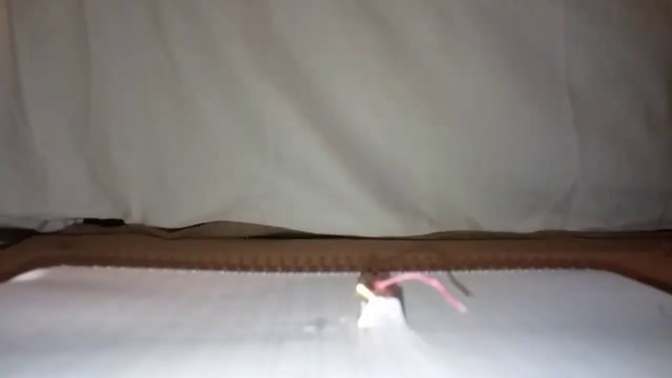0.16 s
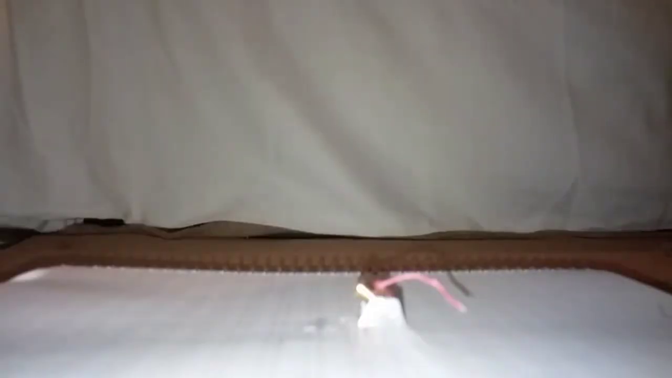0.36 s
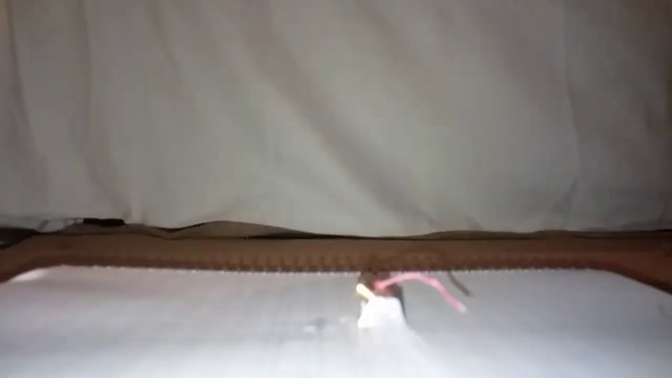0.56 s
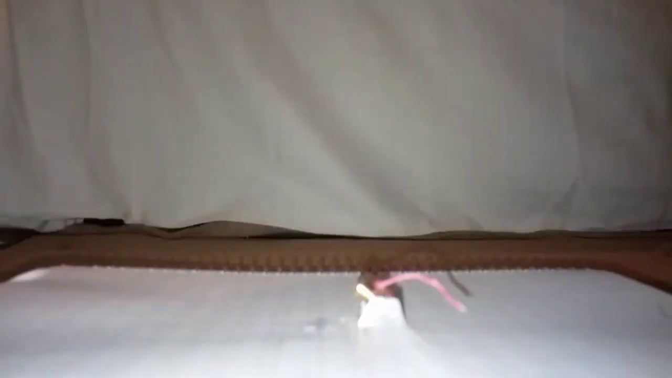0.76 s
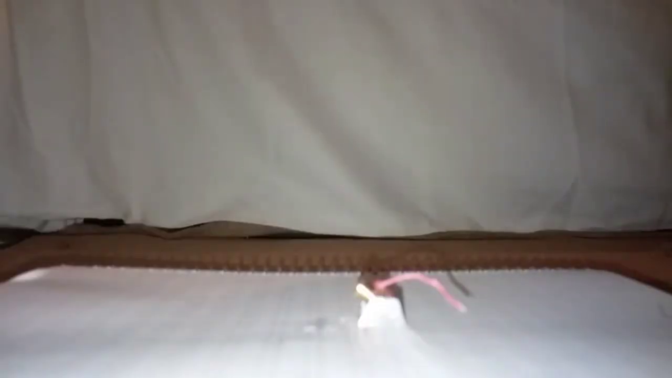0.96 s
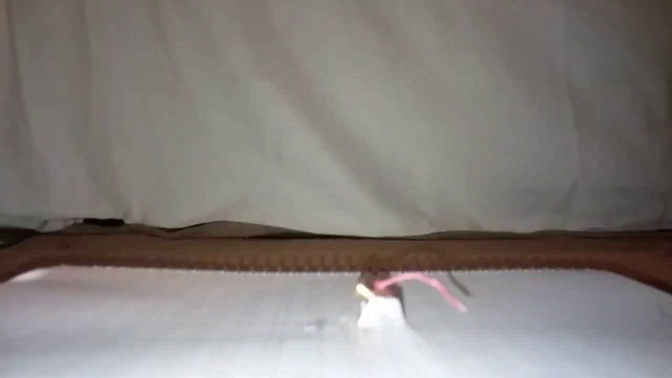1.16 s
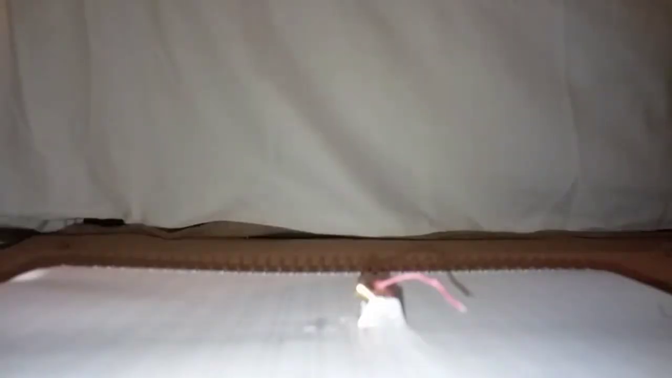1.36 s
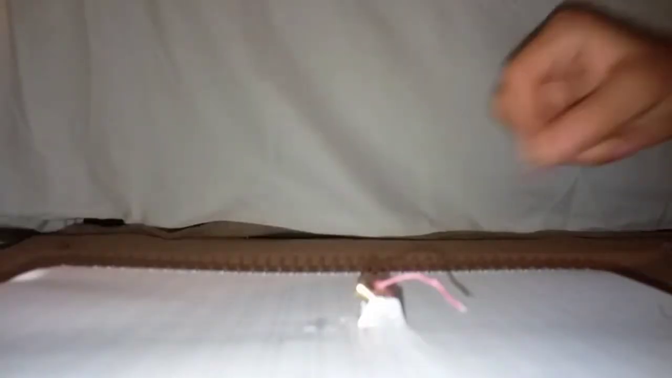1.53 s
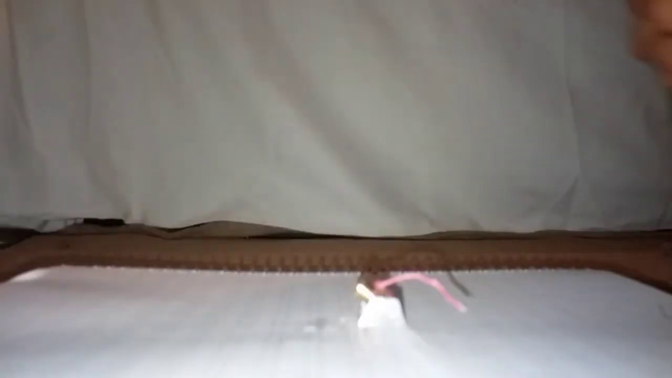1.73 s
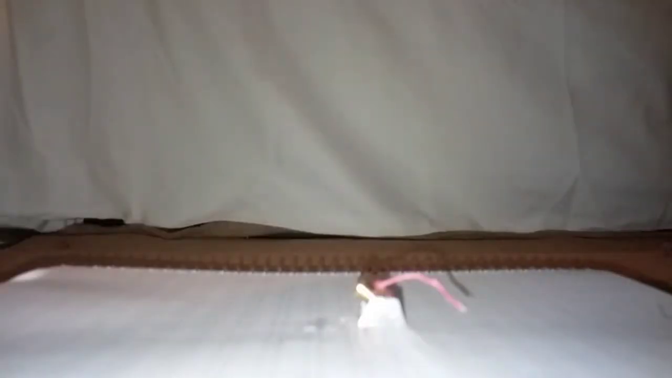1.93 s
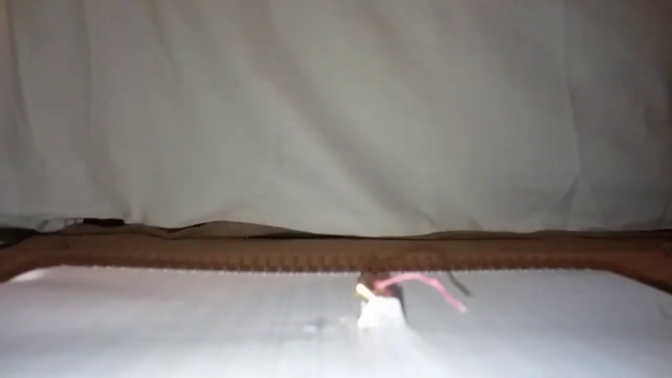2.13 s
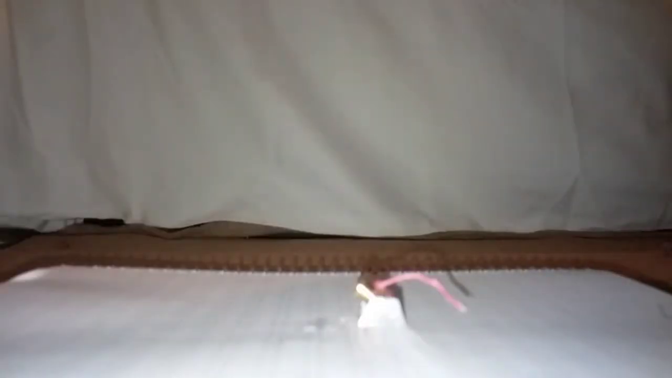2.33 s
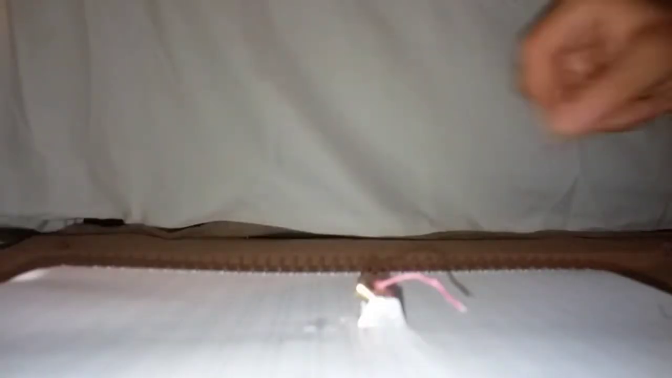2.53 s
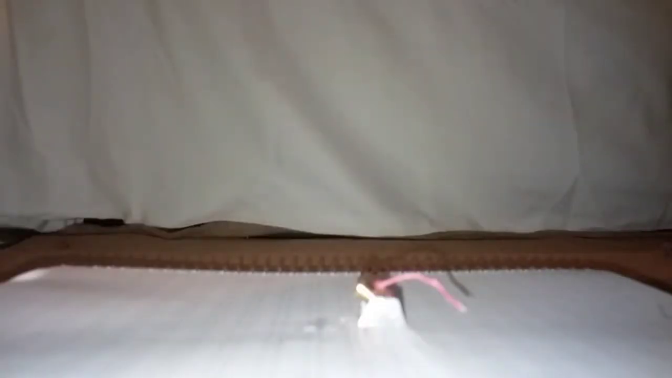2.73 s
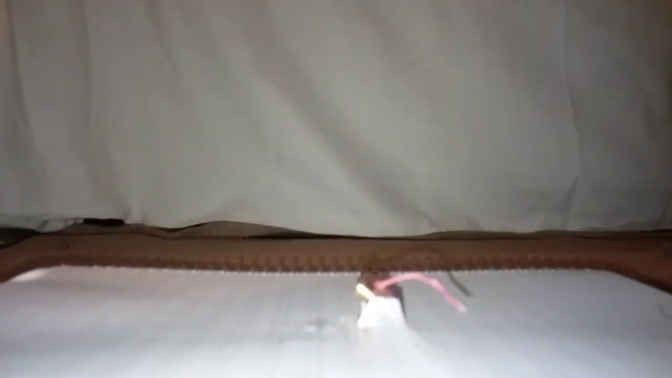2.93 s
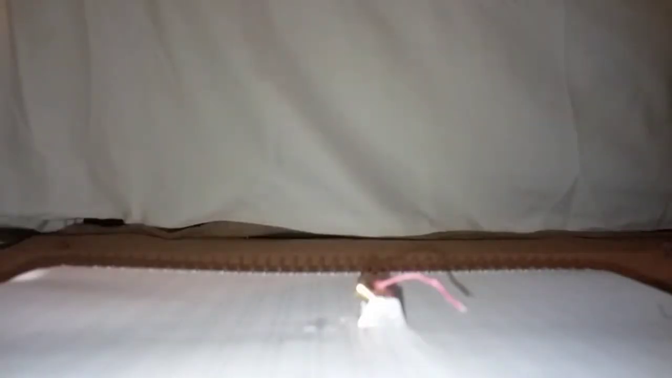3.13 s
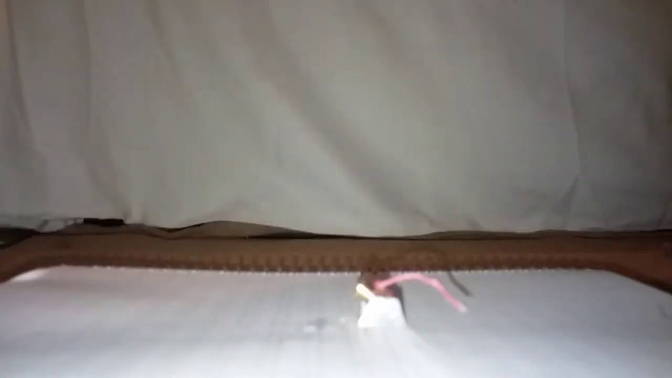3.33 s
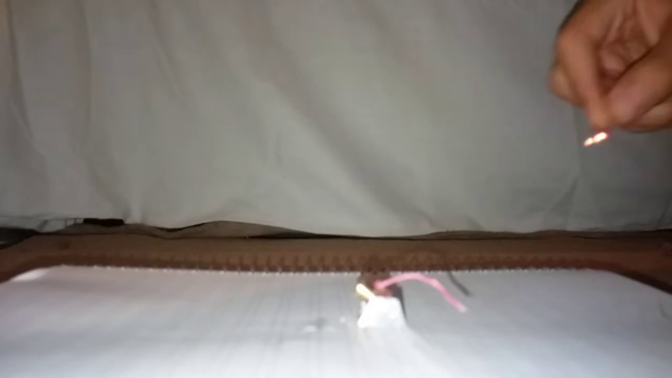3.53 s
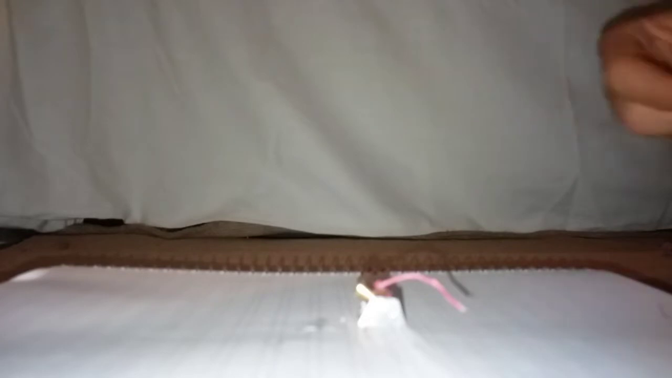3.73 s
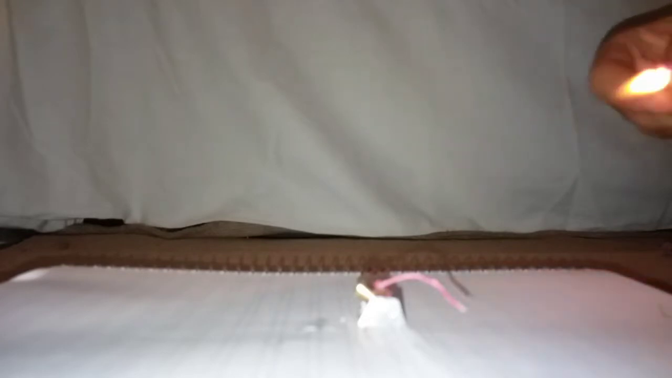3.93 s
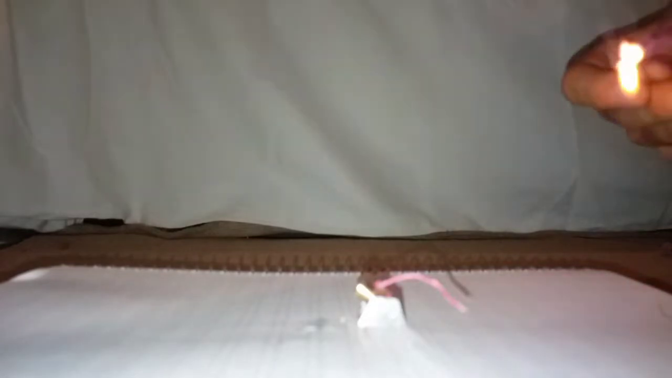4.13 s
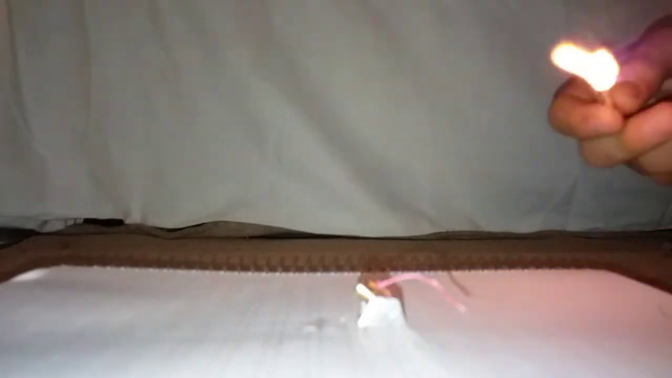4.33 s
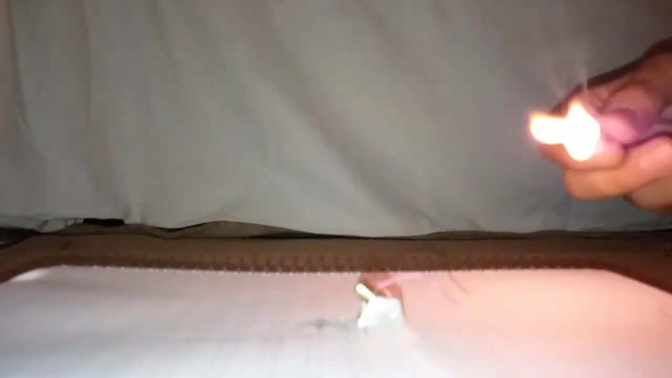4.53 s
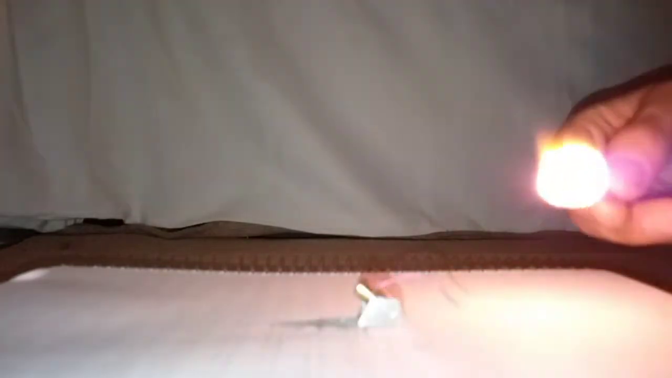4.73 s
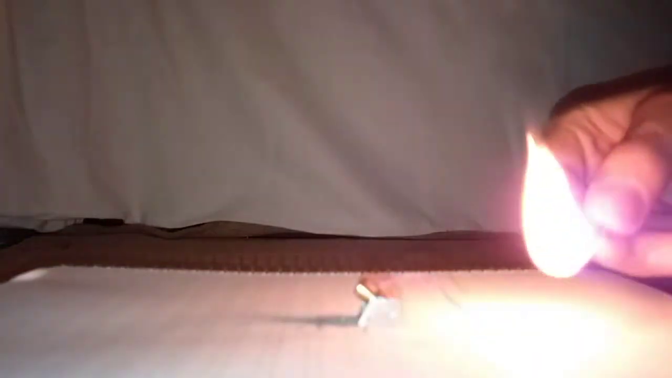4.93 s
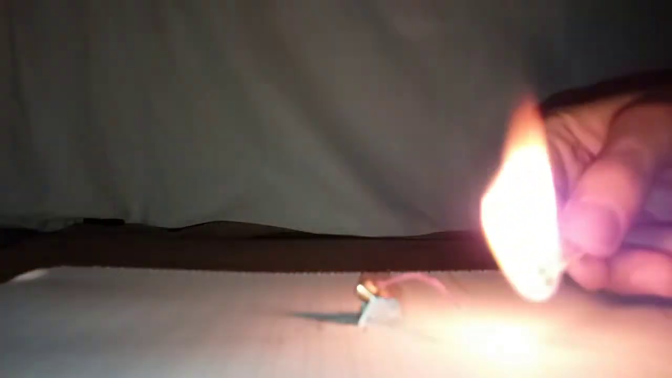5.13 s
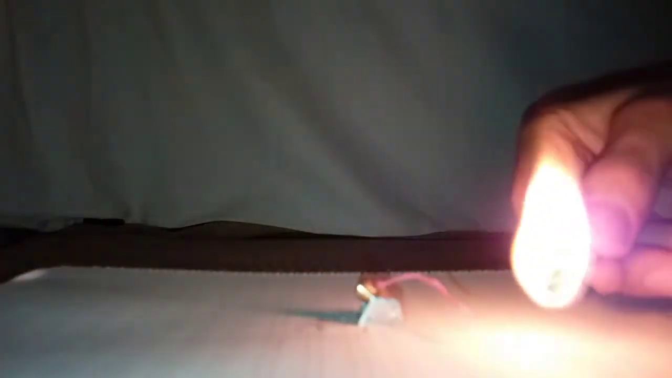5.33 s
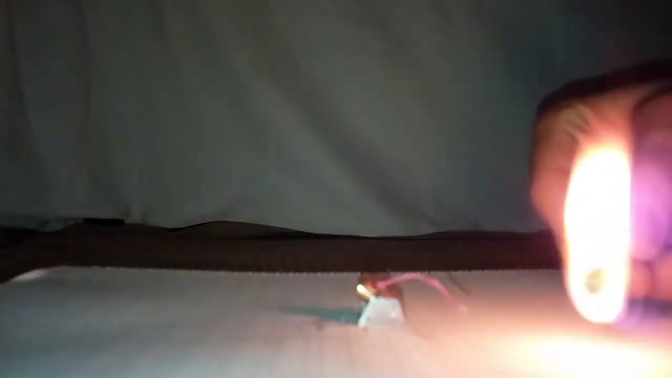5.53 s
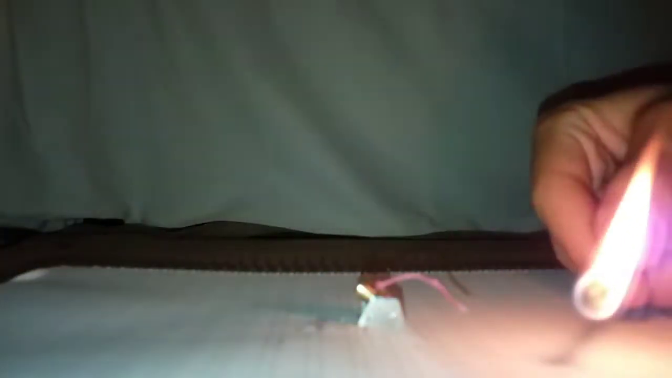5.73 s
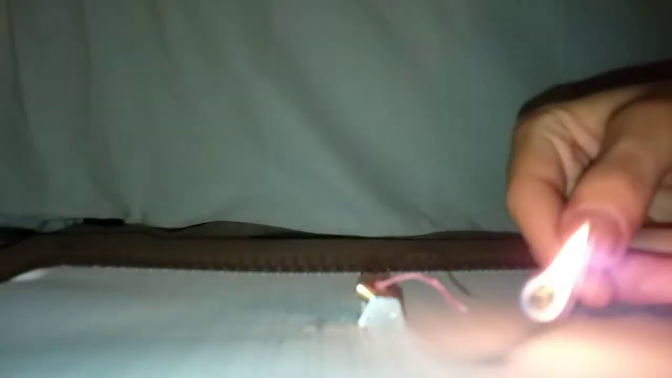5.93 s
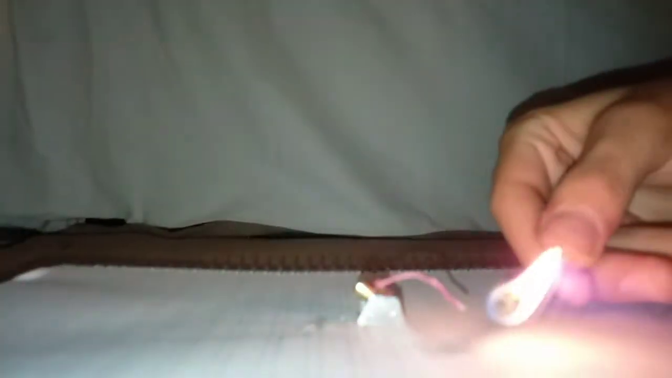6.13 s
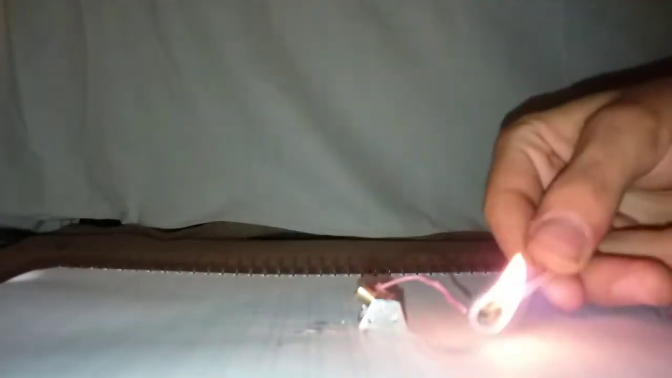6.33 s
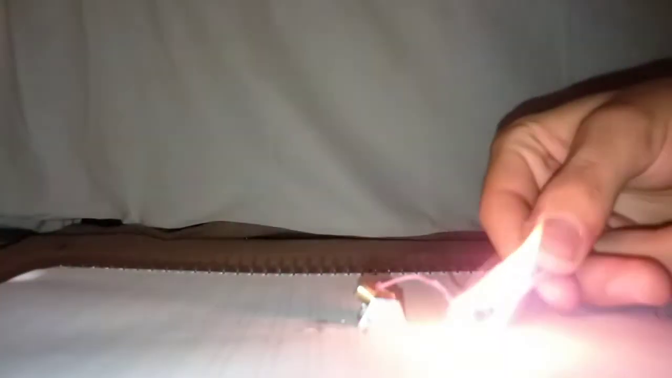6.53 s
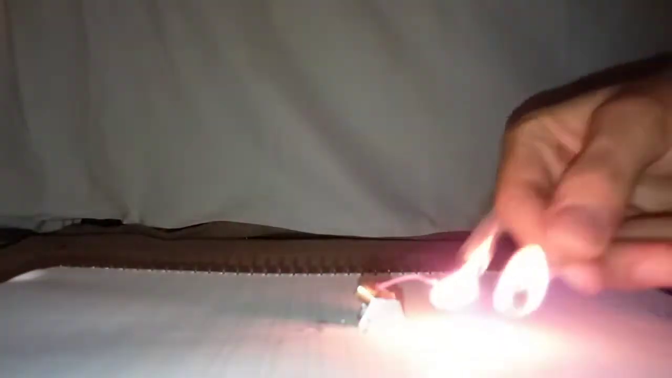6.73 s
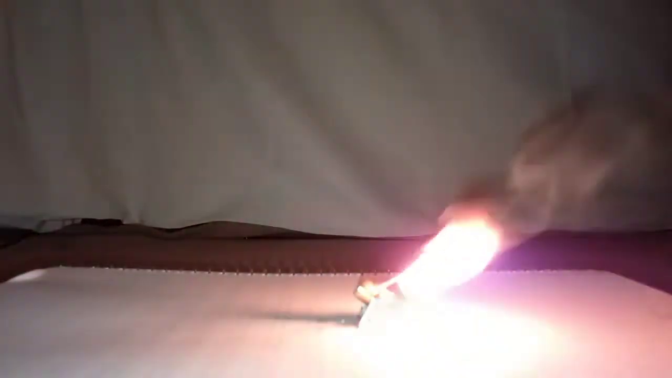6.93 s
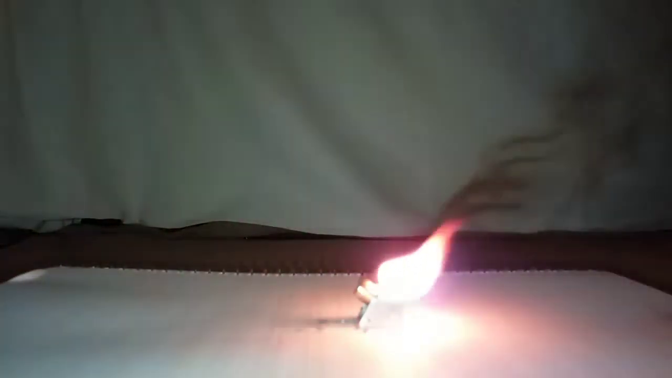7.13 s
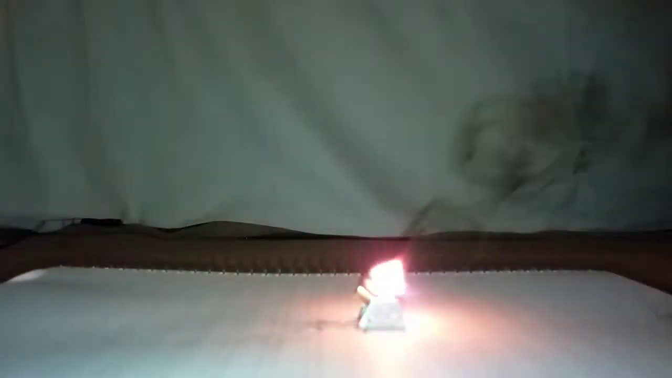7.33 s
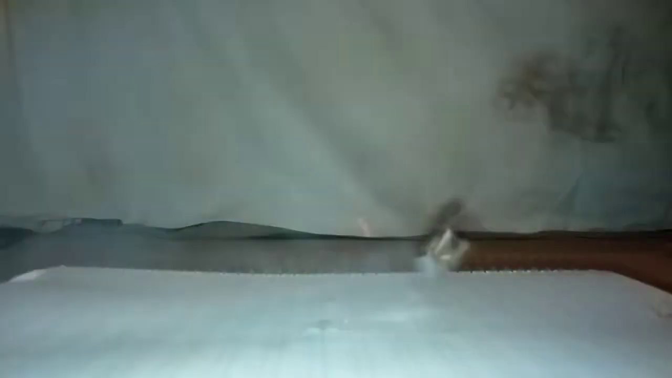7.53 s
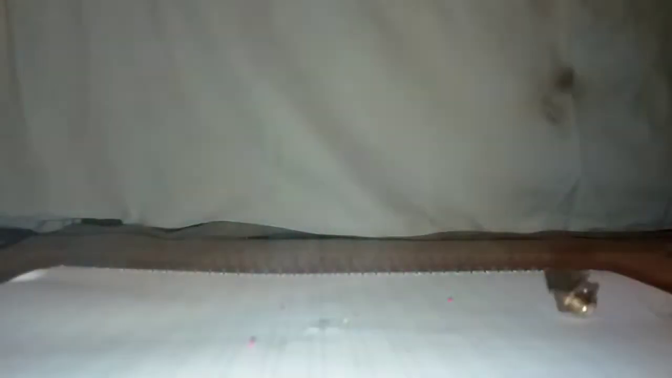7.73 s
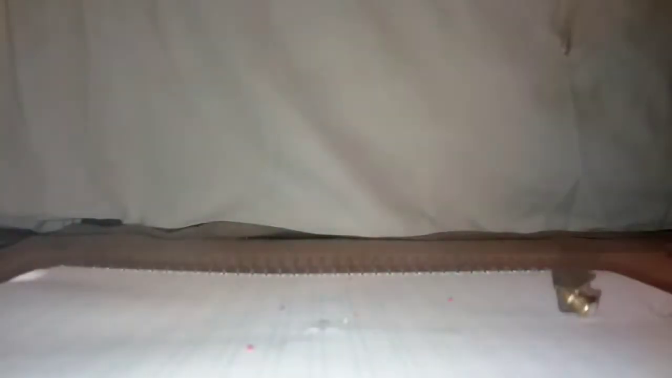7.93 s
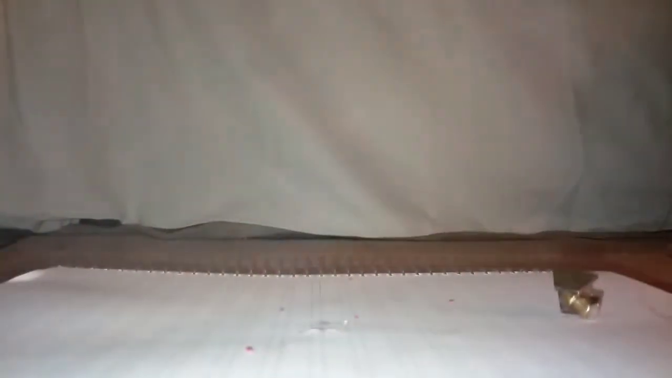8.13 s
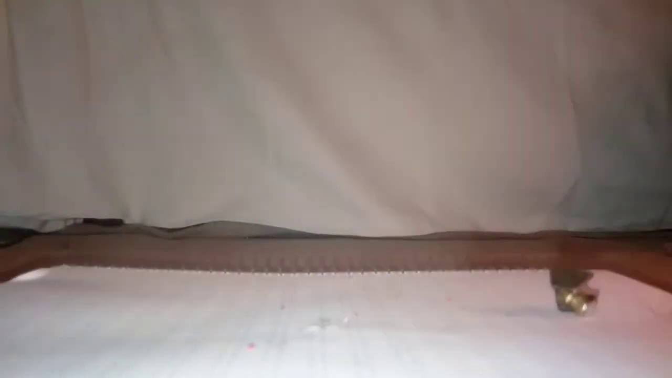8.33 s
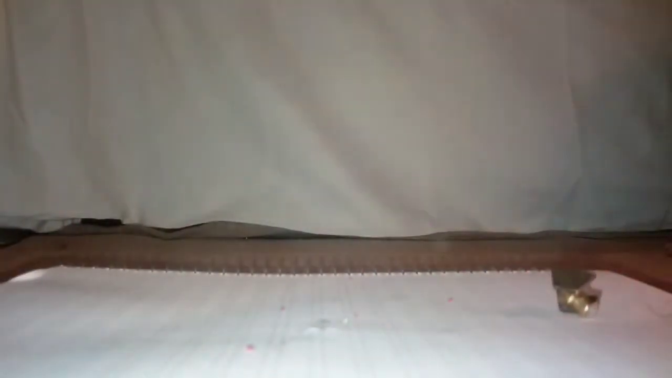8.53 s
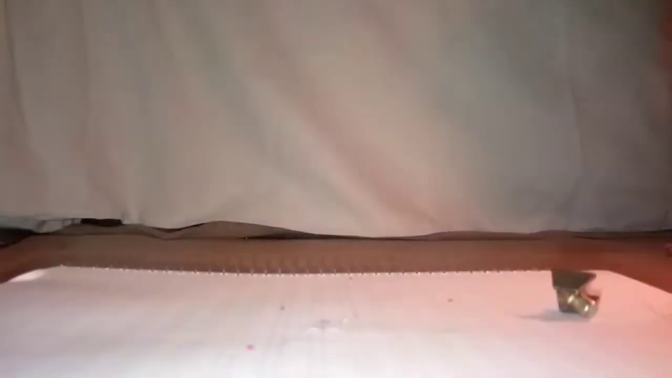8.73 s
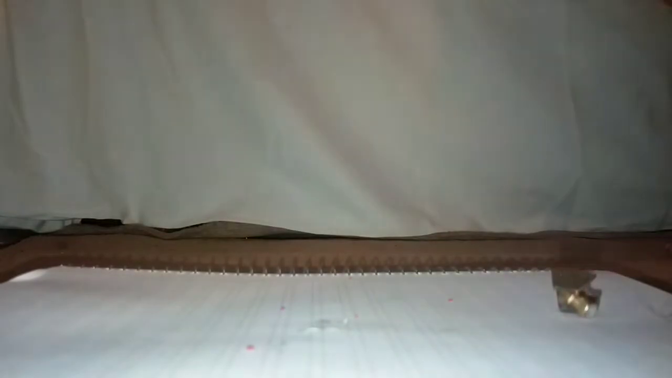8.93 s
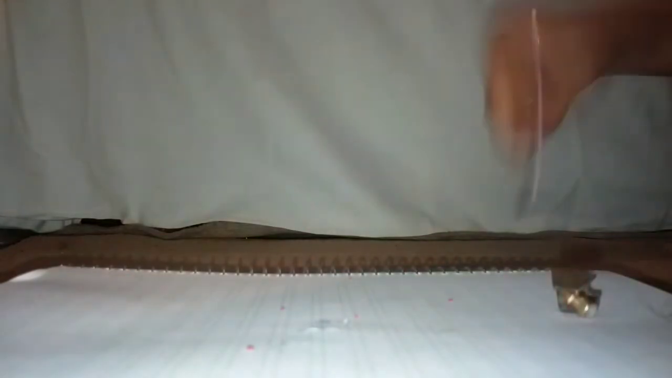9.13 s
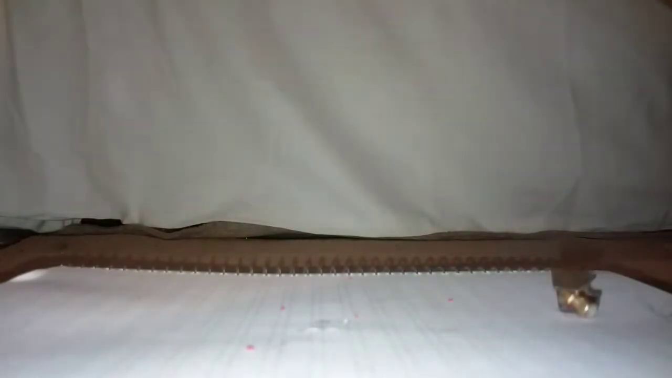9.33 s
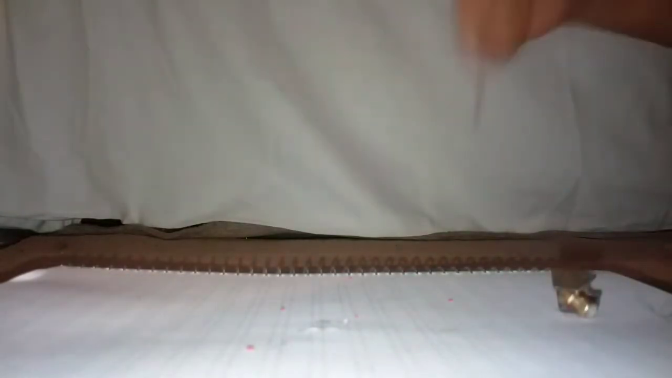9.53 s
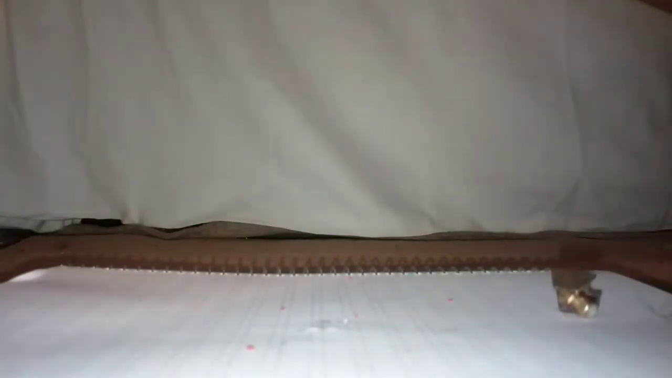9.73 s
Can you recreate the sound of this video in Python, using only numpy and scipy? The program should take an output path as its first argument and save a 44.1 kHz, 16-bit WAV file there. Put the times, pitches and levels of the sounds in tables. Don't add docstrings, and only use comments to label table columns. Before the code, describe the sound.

Match strokes, a crackling flame and a spitting fuse lead to one sharp overloaded blast with ringing metal, then small rattles in a quiet humming room.

```python
import sys
import numpy as np
from scipy import signal
from scipy.fft import rfft, irfft, next_fast_len
from scipy.io import wavfile
from scipy.ndimage import uniform_filter1d, minimum_filter1d

SR = 44100
rng = np.random.default_rng(int(sys.argv[2]) if len(sys.argv) > 2 else 0)


def to_wav(s):
    ch = np.atleast_2d(s).T
    pcm = np.round(np.clip(ch, -1, 1) * 32767)
    wavfile.write(sys.argv[1], SR, pcm.astype(np.int16))


def field_ratio(decibels):
    return 10 ** (np.asarray(decibels, dtype=float) / 20)


N = 435266

# (frequency [Hz], t60 [s])
ROOM = [(60, 0.92), (150, 0.48), (500, 0.51), (1500, 0.48), (4000, 0.43), (8000, 0.33), (14000, 0.28)]
# (frequency [Hz], level [dB per Hz])
CLICK = [(250, -13), (500, 0.5), (2000, 3.5), (8200, -1.5), (9200, -14), (16000, -12.5)]


def evened(x):
    return x / np.sqrt(np.mean(x ** 2) + 1e-20)


def read(points, hz):
    f, value = np.transpose(points)
    return np.interp(np.log(hz + 1), np.log(f + 1), value)


def add(mix, s, sound):
    part = mix[round(s * SR):][:len(sound)]
    part += sound[:len(part)]


def colour(x, spectrum):
    hz = abs(np.fft.fftfreq(8192, 1 / SR))
    log_gain = np.log(field_ratio(np.maximum(read(spectrum, hz), -90)))
    taps = np.fft.ifft(np.exp(np.conj(signal.hilbert(log_gain)))).real[:4096]
    return signal.oaconvolve(x, taps)[:len(x)]


def resonate(x, hz, width_hz, times=1):
    pole = np.exp((2j * np.pi * hz - np.pi * width_hz) / SR)
    for _ in range(times):
        x = 2 * signal.lfilter([1 - abs(pole)], [1, -pole], x).real
    return x


def highpass(x, order, hz):
    return signal.sosfilt(signal.butter(order, hz, "high", fs=SR, output="sos"), x)


def wander(size, span):
    return evened(uniform_filter1d(uniform_filter1d(rng.standard_normal(size), span), span))


def tail(length_s, spectrum, longer=1):
    hz, t, z = signal.stft(rng.standard_normal(round(length_s * SR)), SR, nperseg=512)
    decay_db = 60 * t / (longer * read(ROOM, hz)[:, None])
    z = z * field_ratio(read(spectrum, hz)[:, None] - decay_db)
    out = signal.istft(z, SR, nperseg=512)[1]
    return out / np.linalg.norm(out)


def ticks(rows, ring_db, spectrum):
    out, t = np.zeros(N), np.arange(2000) / SR
    for s, db, hz, t60_s in rows:
        pulse = field_ratio(-19.0 - 60 * t / 0.0011) * rng.standard_normal(len(t))
        pulse[8] = -1
        click = colour(pulse, spectrum)
        click = click / abs(click).max()
        ring = resonate(resonate(rng.standard_normal(len(t)), hz, 0.36 * hz), hz, 0.5 * hz)
        ring = evened(ring) * field_ratio(ring_db - 60 * t / max(t60_s, 0.002))
        add(out, s + 0.0011, field_ratio(db) * (click + ring))
    return out


def hum():
    # (frequency [Hz], level [dB per Hz])
    rumble_spectrum = [(15, -78), (25, -45), (39, -16), (64, -11), (80, -5), (102, -2.5), (173, -11.5),
                       (317, -14), (441, -34.5), (573, -20), (798, -28.5), (840, -34.5), (1600, -57.5),
                       (2080, -80), (3520, -120)]
    # (frequency [Hz], level [dB per Hz])
    vent_spectrum = [(1000, -14.5), (2000, -23), (3200, -8.5), (3900, 0.5), (5200, -2), (5700, -12.5),
                     (6300, -8), (8300, -12), (9200, -19.5), (15500, -14)]
    # (frequency [Hz], width [Hz], level [dB])
    fan_lines = [(100.5, 3.7, -59), (139, 2.9, -54.5), (206, 12, -59), (243, 8, -59.5), (314, 6.8, -58),
                 (405, 7, -64.5), (580, 8, -66.5), (608, 10, -68), (671, 6.5, -66), (788, 10, -65),
                 (876, 10, -76.5)]
    rumble_db, mains_hz, mains_db = -46.5, 99.4, -46
    vent_db, fade_db_per_s = -64.5, -0.03
    cycle_s, dip_s, dip_db, dip_sharpness = 0.444, 1.724, -5, 3.0

    size = next_fast_len(N, True)
    hz, t = np.fft.rfftfreq(size, 1 / SR), np.arange(N) / SR

    def steady_noise(spectrum):
        return evened(irfft(rfft(rng.standard_normal(size)) * field_ratio(read(spectrum, hz)), size)[:N])

    rumble = field_ratio(rumble_db) * steady_noise(rumble_spectrum)
    fan = sum(field_ratio(db) * evened(resonate(rng.standard_normal(N), f, w)) for f, w, db in fan_lines)
    mains = field_ratio(mains_db) * np.sqrt(2) * np.sin(2 * np.pi * mains_hz * t)
    flutter = abs(np.cos(np.pi * (t - dip_s) / cycle_s)) ** dip_sharpness
    swell_db = vent_db + fade_db_per_s * t + dip_db * flutter + 0.98 * wander(N, 2500)
    return rumble + fan + mains + field_ratio(swell_db) * steady_noise(vent_spectrum)


def brushes():
    # (time [s], level [dB], t60 [s])
    touches = [
        (0.001, -47, 0.075),
        (0.11, -59, 0.42),
        (0.31, -49, 0.21),
        (0.465, -56, 0.27),
        (3.255, -55, .2),
    ]
    # (frequency [Hz], level [dB per Hz])
    spectrum = [(1200, -34), (2400, -5.5), (4500, -4), (7500, -2.5), (9200, -14), (15500, -11.5)]
    out, t = np.zeros(N), np.arange(SR // 2) / SR
    for s, db, t60_s in touches:
        grain = rng.standard_normal(len(t)) * field_ratio(2.5 * wander(len(t), 60))
        grain = evened(colour(grain, spectrum))
        add(out, s, field_ratio(db - 60 * t / t60_s) * np.minimum(t / 0.0048, 1) * grain)
    return out


def snaps():
    # (time [s], peak [dB], pitch [Hz], t60 [s])
    events = [(0.4444, -46, 4170, 0.02), (0.8748, -38, 5000, 0.022), (1.3362, -10, 2450, 0.036),
              (1.8795, -33, 1940, 0.027), (2.3353, -9, 4500, .012), (2.3272, -19, 5000, .01),
              (1.3325, -16, 2000, 0.011), (3.3012, -13, 8000, 0.011), (3.3062, -10, 8500, .006),
              (2.808, -29.5, 4420, 0.0099), (3.2897, -6, 5000, 0.011), (2.8086, -34, 2110, .024),
              (2.8091, -34, 8400, 0.012), (7.8424, -25, 9000, .02), (7.9663, -30, 7700, .015),
              (8.685, -43, 2100, .01), (9.108, -45, 5500, .012)]
    # (frequency [Hz], level [dB per Hz])
    spectrum = [(500, -24), (1800, -4), (8200, 2.5), (9200, -13), (16000, -17)]
    return ticks(events, -9.5, spectrum)


def rings():
    # (time [s], frequency [Hz], level [dB], t60 [s])
    tones = [
        (1.185, 1200, -61, .7),
        (1.178, 1495, -63, .6),
        (7.47, 1502, -22, 1.45),
        (7.47, 1511, -33, 1.1),
    ]
    out, t = np.zeros(N), np.arange(2 * SR) / SR
    for s, hz, db, t60_s in tones:
        add(out, s, field_ratio(db - 60 * t / t60_s) * np.sin(2 * np.pi * hz * t) * np.minimum(t / 0.012, 1))
    return out


def head_touches():
    # (time [s], peak [dB], pitch [Hz], t60 [s])
    events = [
        (1.945, -37.5, 1860, 0.11),
        (1.2988, -38, 2200, 0.045),
        (1.3078, -34, 1900, .04),
        (3.3135, -21, 800, 0.017),
        (1.333, -21, 2600, .05),
        (1.336, -25, 5700, .04),
        (2.322, -25, 5700, .03),
    ]
    return ticks(events, 0, CLICK)


def strokes():
    # (start [s], length [s], scrape [dB], treble at full speed [dB], drop at lift-off [dB])
    scrapes = [
        (1.307, 0.051, -20, -4.5, -10),
        (1.935, 0.047, -37, -9.5, -11),
        (2.309, 0.046, -20.5, -6.5, -7.5),
        (3.276, 0.042, -20.5, -2.5, -1),
    ]
    # (frequency [Hz], level [dB per Hz])
    grit_spectrum = [(120, -50), (200, -0.5), (1080, -11.5), (1450, -18), (2170, -0.5), (3130, -3.5),
                     (5520, -7), (7270, -3.5), (7970, -8), (9230, -9.5), (16000, -11.5)]
    # (frequency [Hz], width [Hz], level [dB])
    box_modes = [(1776, 172, 9), (2140, 150, 4.5), (2620, 300, 0), (4170, 450, 4), (5030, 370, 6),
                 (5660, 390, 3), (7940, 633, 0.5)]
    start_db, peak_share, slow_treble_db = -19, 0.54, -10.5
    body_spectrum = grit_spectrum[:-2] + [(10000, -33.5)]
    out = np.zeros(N)
    for start_s, length_s, top_db, bright_db, end_db in scrapes:
        s = start_s + length_s * np.array([0, peak_share / 2, peak_share, 1])
        db = top_db + np.array([start_db, 0.194 * start_db, 0, end_db])
        treble_db = bright_db + slow_treble_db * np.array([0.78, 0.55, 0.077, 0.054])
        t = np.arange(s[0], s[-1], 1 / SR)
        grit = rng.standard_normal(len(t)) * field_ratio(0.95 * wander(len(t), 20))
        box = sum(field_ratio(g) * resonate(grit, f, w) for f, w, g in box_modes)
        body = evened(colour(0.28 * grit + box, body_spectrum))
        treble = evened(resonate(grit, 13460, 6600, 2)) * field_ratio(np.interp(t, s, treble_db))
        fade = signal.windows.tukey(len(t), 0.08)
        add(out, s[0], field_ratio(np.interp(t, s, db)) * (body + treble) * fade)
    return out


def knocks():
    # (time [s], peak [dB], frequency [Hz], t60 [s])
    events = [(1.3345, -22, 2670, .03), (1.35, -17, 2070, 0.015), (2.337, -18, 2850, 0.026),
              (3.3146, -8.5, 1800, 0.0091), (3.3175, -13, 1920, 0.016), (1.339, -22.5, 2280, .025),
              (8.03, -38, 2100, .03), (8.054, -39, 2100, .03), (8.073, -43, 2100, .03),
              (8.189, -38, 1950, .03), (8.212, -36, 740, .04), (8.241, -40, 720, .04),
              (8.256, -43, 740, .03), (8.286, -32, 720, .04), (8.302, -43, 740, .03)]
    out, t = np.zeros(N), np.arange(3000) / SR
    for s, db, hz, t60_s in events:
        add(out, s, field_ratio(db - 60 * t / t60_s) * np.sin(2 * np.pi * hz * t) * np.minimum(t / 0.0008, 1))
    return out


def drawer():
    # (time [s], level [dB], frequency [Hz], width [Hz], t60 [s])
    hollow_ring = (1.35, -45.5, 2519, 419, 0.2)
    s, db, hz, width_hz, t60_s = hollow_ring
    out, t = np.zeros(N), np.arange(SR // 2) / SR
    ring = evened(resonate(rng.standard_normal(len(t)), hz, width_hz, 2))
    add(out, s, field_ratio(db - 60 * t / t60_s) * np.minimum(t / 0.01, 1) * ring)
    return out


def notch(x, hz, depth, width_hz):
    turn = np.exp(2j * np.pi * np.cumsum(hz) / SR)
    r = np.exp(-np.pi * width_hz / SR)
    return x - depth * 2 * (turn * signal.lfilter([1 - r], [1, -r], x / turn)).real


def bounced(x):
    # (time [s], extra path [ms], strength [0-1])
    paths = [
        [(3.6, 1.18, .35), (3.78, 1.2, .35), (3.9, 1.38, .35), (4.25, 1.36, .2), (4.34, .75, .4),
         (4.45, .83, .55), (4.55, .9, .55), (4.7, .94, .35), (4.8, .97, .2), (5.1, 1.14, .3), (6.72, 1.1, .2),
         (6.8, .9, .1), (7.15, .92, .15), (7.25, 1.15, .2)],
        [(4.3, .45, .3), (4.45, .5, .05), (6.4, .43, .3), (6.7, .43, .3), (6.76, .43, 0)],
        [(4.4, 1.5, 0), (4.6, 1.68, .25), (4.9, 1.88, .2), (5.5, 1.92, .2), (7.1, 1.62, 0), (7.3, 1.62, .25)],
    ]
    # (time [s], notch frequency [Hz], depth [0-1])
    shadow = [(3.58, 5400, 0.65), (3.64, 3830, 0.4), (3.85, 3660, 0.63), (3.97, 3200, 0.57),
              (4.2, 3150, 0.73), (4.36, 3400, 0.6), (4.46, 3800, 0.4), (4.6, 3820, 0.3)]
    t, out = np.arange(N) / SR, x
    for path in paths:
        s, ms, strength = np.transpose(path)
        delay_s = np.interp(t, s, ms) / 1000
        out = out + np.interp(t, s, strength) * np.interp(t - delay_s, t, x)
    s, hz, depth = np.transpose(shadow)
    return notch(out, np.interp(t, s, hz), np.clip(np.interp(t, s, depth), 0, 1), 1300)


def flames():
    # (time [s], steady hiss [dB], unsteadiness [dB])
    burns = [
        [(3.33, -68, -8), (3.44, -45, 1.5), (3.54, -52.5, 3), (3.74, -54.5, 2.5), (3.88, -42.5, 3),
         (4.14, -48, 1.5), (4.45, -44, 1.5), (4.78, -43.5, 2.5), (4.92, -40, 2), ],
        [(4.92, -41, -2.5), (5.095, -43, 4), (5.11, -52.5, 4.5), (5.35, -49.5, 1), (5.43, -63.5, 4),
         (5.518, -54.5, 1), (5.652, -73, -6), (5.8, -67, 0)],
        [(6.35, -72, 3.5), (6.45, -59, 5.5), (6.51, -46.5, 2), (6.72, -45, 2.5), (6.745, -39, 1.2),
         (7.022, -41, 3), (7.028, -55, 1), (7.04, -43, 3), (7.16, -37, 2), (7.19, -44, 2.5)],
        [(7.19, -51, 3.5), (7.305, -48, 3.5), (7.335, -49, 2), (7.37, -60, 1.5), (7.43, -55.5, 3.5),
         (7.46, -66, 1)],
    ]
    # (frequency [Hz], level [dB per Hz])
    hiss_spectrum = [(120, -31), (200, -2), (473, -11), (749, -1.5), (916, -13), (1370, -3), (1840, -11.5),
                     (2130, -7), (7970, -12), (9230, -20.5), (16000, -21.5)]
    # (time [s], peak [dB], length [s])
    head_puffs = [(3.483, -28.5, 0.055), (3.536, -22, 0.034), (3.588, -31, 0.0034), (3.601, -31, 0.0045),
                  (3.627, -21, 0.0087), (3.705, -15.5, 0.008), (3.714, -24.5, 0.017), (3.7397, -19, 0.0097),
                  (3.809, -28, 0.011), (3.835, -25, 0.019), (3.878, -33, 0.0057), (3.911, -25, 0.009),
                  (3.9419, -39, 0.011), (3.985, -23.5, 0.019), (4.066, -26.5, 0.027), (4.115, -28, 0.012),
                  (4.137, -26, 0.011), (4.2065, -38, 0.0057), (4.514, -34, 0.0096), (4.614, -32, .008),
                  (4.843, -28, 0.011), (4.917, -33, .006), (4.935, -27, 0.005), (5.12, -32, .006),
                  (5.129, -34, 0.0039), (5.273, -32, .004), (4.625, -29.5, 0.038), (4.737, -34, 0.018),
                  (4.824, -27, 0.016), (5.061, -30, 0.031), (5.249, -21, 0.0076), (5.28, -27.5, 0.021),
                  (5.342, -22, 0.013), (5.408, -25.5, 0.0089), (5.42, -27, 0.007), (5.113, -34, 0.015),
                  (5.157, -32.5, 0.011), (5.197, -28.5, .008), (5.494, -27, 0.043), (5.522, -21.5, 0.018)]
    # (time [s], peak [dB], length [s])
    fuse_puffs = [(6.461, -34.5, 0.0098), (6.515, -30, 0.011), (6.592, -30, 0.0052), (6.6593, -31, 0.0073),
                  (6.733, -26, 0.02), (6.843, -23, 0.014), (7.277, -28.5, 0.005), (7.39, -33.5, 0.028),
                  (7.419, -31.5, .009), (6.777, -29, .012), (7.295, -32.5, .006), (7.318, -30, .01)]
    # (time [s], level [dB])
    roar_curve = [(3.4, -5), (3.8, 5), (4.5, 9.5), (5.3, 10.5), (5.55, 2.5), (6.5, 10.5), (6.8, 8),
                  (6.94, 9), (7.14, 8.5), (7.2, 2.5)]
    # (time [s], treble [dB])
    aim_curve = [(3.4, 5), (4.7, -1.5), (5.0, -1.5), (5.3, -1), (6.5, 4), (6.8, 3), (7.2, 4)]
    sparks_per_s = 400

    t = np.arange(N) / SR
    level, unsteady_db = np.zeros(N), np.zeros(N)
    for rows in burns:
        s, db, sputter_db = np.transpose(rows)
        on = (t > s[0]) & (t < s[-1])
        level[on] = field_ratio(np.interp(t[on], s, db))
        unsteady_db[on] = np.interp(t[on], s, sputter_db)
    level *= field_ratio(1.6 * wander(N, 250) + 0.98 * wander(N, 25))
    chop_db = unsteady_db * wander(N, 70)

    u = np.arange(4000) / SR
    for s, db, length_s in head_puffs + fuse_puffs:
        stop = np.exp(-(u / max(length_s, 0.003)) ** 3.5)
        add(level, s, field_ratio(db - 16.5) * np.minimum(u / 0.0022, 1) * stop)

    spark_size = field_ratio(4.3 * np.minimum(rng.exponential(1, N), 4)) * rng.choice([-1, 1], N)
    sparks = (rng.random(N) < sparks_per_s / SR) * spark_size
    hiss = evened(colour(rng.standard_normal(N) + 2.0 * sparks, hiss_spectrum))
    jet = level * field_ratio(chop_db) * hiss
    treble = signal.sosfiltfilt(signal.butter(4, 9000, "high", fs=SR, output="sos"), jet)
    jet = jet + (field_ratio(np.interp(t, *np.transpose(aim_curve))) - 1) * treble

    rumble = evened(resonate(resonate(rng.standard_normal(N), 620, 550), 700, 600))
    roar = field_ratio(np.interp(t, *np.transpose(roar_curve))) * level * rumble
    return bounced(jet) + field_ratio(-14.0 + 1.1 * wander(N, 200)) * roar


def cracks():
    # (time [s], peak [dB], pitch [Hz])
    head_cracks = [(3.6297, -34, 2430), (3.7071, -23, 6710), (3.783, -24, 2500), (3.8118, -21.5, 7940),
                   (4.2084, -24, 5660), (4.7264, -30, 1200), (5.1422, -31, 2675), (5.1597, -31, 2720),
                   (5.1744, -26, 2090), (5.187, -31, 2530), (5.2006, -38, 2110), (5.23, -16.5, 2060),
                   (5.3063, -21.5, 8430), (5.3145, -18, 2700), (5.341, -28, 7000), (5.3308, -23, 4270),
                   (5.3496, -25, 2090), (5.424, -36, 2690), (5.4764, -31, 1570), (5.4913, -22, 2660),
                   (5.5871, -27.5, 2050), (5.6247, -38, 1570), (5.666, -40.5, 2540), (5.7193, -39.5, 4350)]
    # (time [s], peak [dB], pitch [Hz])
    fuse_spits = [(6.596, -33, 900), (6.8783, -38, 4060), (7.2045, -18, 3100), (7.2237, -24.5, 4490),
                  (7.2325, -23, 3218), (7.2383, -20, 4500), (7.2432, -15, 4346), (7.2773, -28, 3753),
                  (7.2846, -28, 3150), (7.3174, -31, 1810), (7.3235, -26, 1706), (7.3306, -18, 3270),
                  (7.3563, -19.5, 2340), (7.3955, -30, 2968), (7.4025, -31.5, 1620), (7.419, -30.5, 1800)]
    t60_s = 0.0065
    rows = [row + (t60_s,) for row in head_cracks + fuse_spits]
    return field_ratio(1.5) * bounced(ticks(rows, -15, CLICK))


def pops():
    # (time [s], peak [dB])
    bursts = [(3.705, -30), (3.831, -34), (3.983, -29), (4.447, -33), (4.494, -25), (4.704, -35),
              (4.725, -25), (4.879, -27), (4.989, -34), (5.062, -43), (6.517, -32), (6.559, -29),
              (6.596, -28), (6.639, -28), (6.658, -31), (6.735, -30), (6.752, -32), (6.78, -35),
              (6.841, -36), (6.919, -29), (6.944, -26), (6.984, -38), (7.096, -37), (7.144, -34)]
    # (frequency [Hz], level [dB per Hz])
    spectrum = [(300, -12), (700, 0), (1500, -14.5), (6000, -30.5)]
    pitch_hz, t60_s = 730, 0.022
    rows = [(s - 0.001, db, pitch_hz, t60_s) for s, db in bursts]
    return field_ratio(-5.0) * ticks(rows, 0, spectrum)


def shot():
    # (frequency [Hz], level [dB per Hz])
    blast_spectrum = [(24, -57.5), (40, -23), (69, -14), (167, -2.5), (256, -6.5), (320, -4.5), (455, -9.5),
                      (896, -4.5), (1240, -8), (4030, -6.5), (8400, -15.5), (8900, -25.5), (16000, -25.5)]
    # (frequency [Hz], level [dB per Hz])
    late_spectrum = [(60, -69), (250, -34), (700, -31), (1500, -41.5), (4000, -40), (8000, -50),
                     (14000, -62.5)]
    # (frequency [Hz], level [dB per Hz])
    early_spectrum = [(2000, -31), (4000, -3), (8000, -6.5), (9200, -7.5), (16000, -3)]
    # (frequency [Hz], level [dB])
    room_modes = [(132, -18), (180, -18), (317, -16.5), (638, -19), (899, -19.5), (963, -18.5),
                  (1097, -18.5), (1571, -19), (3281, -19.5), (3450, -20.5), (3642, -17.5), (3927, -18),
                  (4936, -18), (6441, -21), (7266, -24)]
    shot_s, shot_db, pulse_s = 7.4641, 25.5, 0.00019

    echo = tail(2.0, blast_spectrum)
    echo = echo + field_ratio(-35.0) * tail(2.0, late_spectrum, longer=2.6)
    echo = echo + field_ratio(-7.5) * tail(2.0, early_spectrum, longer=0.55)
    echo = highpass(echo, 8, 72)
    echo = echo / np.sqrt(np.mean(echo[:2000] ** 2)) * np.minimum(np.arange(len(echo)) / 60, 1)
    t = np.arange(len(echo)) / SR
    for hz, db in room_modes:
        wave = np.sin(2 * np.pi * (hz * t + rng.random())) * np.minimum(t * hz / 2.7, 1)
        echo = echo + field_ratio(db - 60 * t / (1.12 * read(ROOM, hz))) * wave

    out, u = np.zeros(N), np.arange(400) / SR / pulse_s
    add(out, shot_s, 1.1 * np.minimum(u / 0.4, 1) * (1 - u) * np.exp(-0.3 * u ** 2))
    add(out, shot_s + 0.00055, echo)
    return field_ratio(shot_db) * out


def rocks():
    # (time [s], peak [dB], share of high modes [dB])
    events = [(7.8425, -27, -6), (7.943, -33, -14), (7.9658, -31, -14), (8.0293, -41, -14),
              (8.051, -54, -12.5), (8.0714, -61, -5), (8.1085, -30.5, -9.5), (8.1409, -35, -8),
              (8.1653, -40, -4), (8.1884, -54, -15), (8.2096, -50, -15), (8.2372, -47, -6),
              (8.2524, -50, -12), (8.2626, -51, -18), (8.2836, -49, -6), (8.3014, -55, -12),
              (8.3294, -60, -10), (8.4044, -55, -10)]
    # (frequency [Hz], level [dB], t60 [s])
    cannon_modes = [(497, -3.5, 0.033), (734, -8, 0.058), (1050, -1, 0.033), (1295, 0, 0.034),
                    (1880, 2, 0.028), (2110, -5, 0.029), (2727, 1, 0.017), (3150, 1.5, 0.017),
                    (3410, -6, .014), (5520, -14, .008)]
    out, t = np.zeros(N), np.arange(4000) / SR
    for s, db, high_db in events:
        luck = rng.standard_normal(len(cannon_modes))
        scuff = resonate(rng.standard_normal(len(t)), 2290, 2200)
        scuff = resonate(resonate(scuff, 2300, 2210), 2240, 2200)
        add(out, s, field_ratio(db + 8.0 + 0.5 * high_db - 60 * t / 0.013) * scuff)
        for (hz, mode_db, t60_s), r in zip(cannon_modes, luck):
            level_db = db + 6.5 + mode_db + 2.4 * r + (high_db + 8.5) * (hz > 2400)
            tone = np.sin(2 * np.pi * hz * (1 + 0.013 * r) * t) * np.minimum(t / 0.001, 1)
            add(out, s, field_ratio(level_db - 60 * t / t60_s) * tone)
    return out


def rattle():
    # (start [s], length [s], level [dB], rate [knocks per s])
    chatter = (8.15, .27, -45.5, 140)
    # (frequency [Hz], width [Hz], level [dB])
    table_modes = [(310, 70, 3), (520, 200, -2), (720, 160, 0)]
    s, length_s, db, rate = chatter
    out, size = np.zeros(N), round(length_s * SR)
    hits = (rng.random(size) < rate / SR) * rng.uniform(-0.58, 1, size)
    hits = hits + 0.02 * rng.standard_normal(size)
    body = sum(field_ratio(g) * evened(resonate(hits, f, w, 2)) for f, w, g in table_modes)
    add(out, s, field_ratio(db) * body * signal.windows.tukey(size, 0.2) * np.linspace(1.2, 0.3, size))
    return out


def hand_thud():
    # (time [s], level [dB], frequency [Hz], width [Hz], t60 [s])
    landing = (9.056, -45, 720, 700, .05)
    s, db, hz, width_hz, t60_s = landing
    out, t = np.zeros(N), np.arange(4000) / SR
    body = evened(resonate(rng.standard_normal(len(t)), hz, width_hz, 3))
    add(out, s, field_ratio(db - 60 * t / t60_s) * body * np.minimum(t / 0.004, 1))
    return out


def scene():
    near = brushes() + snaps() + head_touches() + strokes() + knocks()
    near = near + flames() + cracks() + pops() + rocks() + rattle() + hand_thud()
    # (frequency [Hz], level [dB])
    walls = [(200, -3), (1000, -5.0), (2100, -6), (2600, -3.5), (3200, -5), (6000, -4.5), (12000, -6.0)]
    wet = np.roll(signal.oaconvolve(near, tail(0.7, walls))[:N], 250)
    mix = near + field_ratio(-17.0) * wet + hum() + rings() + drawer() + shot()
    return np.tile(mix, (2, 1))


def roll_off(x):
    return signal.sosfilt(signal.butter(12, 16960, fs=SR, output="sos"), x)


def record(dry):
    # (time [s], depth [dB], fall [s], let-go [s], return [s])
    ducks = [
        (1.34, -4, 0.479, 2.58, 1),
        (7.465, -18, 0.18, 8.87, 0.56),
    ]
    # (frequency [Hz], level [dB per Hz])
    preamp_spectrum = [(1000, -21.5), (3500, -4), (6000, 0.5), (9000, -3.5), (15500, 0)]
    # (from [s], to [s])
    dropout_spans = [
        (3.35, 5.1),
        (6.45, 6.72),
        (7.24, 7.33),
    ]
    # (frequency [Hz], level [dB])
    apart = [(3000, -63.5), (7000, -34.5), (12000, -11), (16000, -16.5)]
    preamp_db, low_edge_hz, high_edge_hz = -85.5, 52, 15950

    t = np.arange(N) / SR
    gain_db = -1.0
    for s, db, fall_s, go_s, back_s in ducks:
        fall = 1 - np.exp(-np.maximum(t - s, 0) / fall_s)
        gain_db = gain_db + db * fall / (1 + np.exp(np.minimum(5 * (t - go_s) / back_s, 50)))
    x = dry[0] * field_ratio(gain_db)
    x = x + field_ratio(preamp_db) * evened(colour(rng.standard_normal(N), preamp_spectrum))

    peak = -minimum_filter1d(-abs(x), size=300, origin=110)
    limit = np.maximum(0.97 * abs(uniform_filter1d(peak, size=40)) ** 0.955, 1)
    x = 1.3 * np.tanh(x / 1.3 / limit)
    x = highpass(x, 3, low_edge_hz)

    hz, t, z = signal.stft(x, SR, nperseg=1024)
    luck, turn = rng.standard_normal((len(t), len(hz), 2)).T
    luck = uniform_filter1d(uniform_filter1d(luck[::9], 2, 0), 9, 1)
    luck = evened(luck).repeat(9, 0)
    busy_db = 10 * np.log10((abs(z[40:200]) ** 2).sum(0) + 1e-12)
    in_span = np.any([(t > a) & (t < b) for a, b in dropout_spans], 0)
    lost = (luck > 0.7) & in_span & (hz[:, None] > 9000) & (busy_db > -55) & (busy_db < -41)
    z = z * np.where(lost, 0, 1) * (hz[:, None] < high_edge_hz)

    side = z * field_ratio(read(apart, hz))[:, None] * np.exp(2j * np.pi * turn)
    stereo = signal.istft(np.array([z + side, z - side]), SR, nperseg=1024)[1][:, :N]
    return roll_off(stereo)


dry = scene()
out = record(dry)
to_wav(out)
```